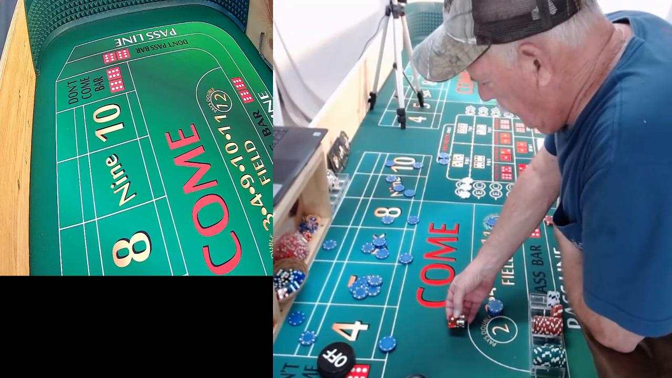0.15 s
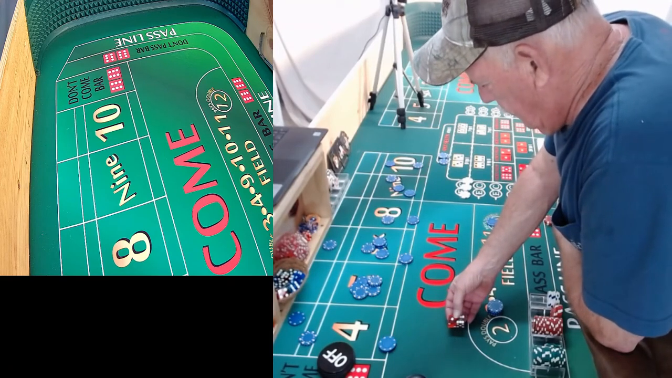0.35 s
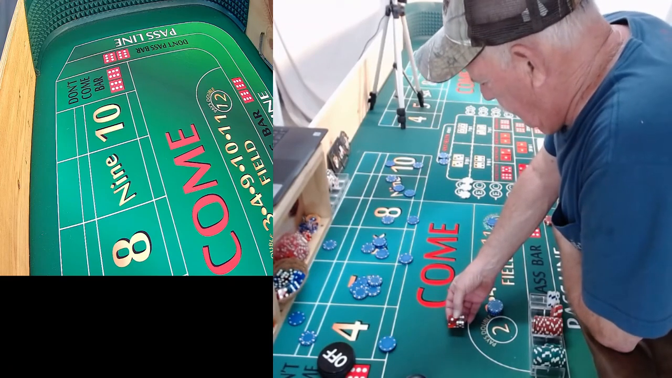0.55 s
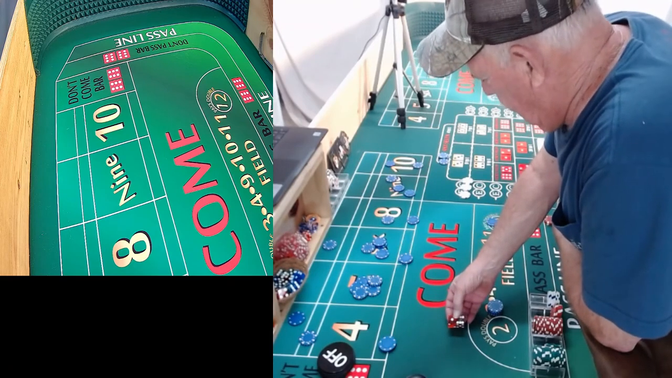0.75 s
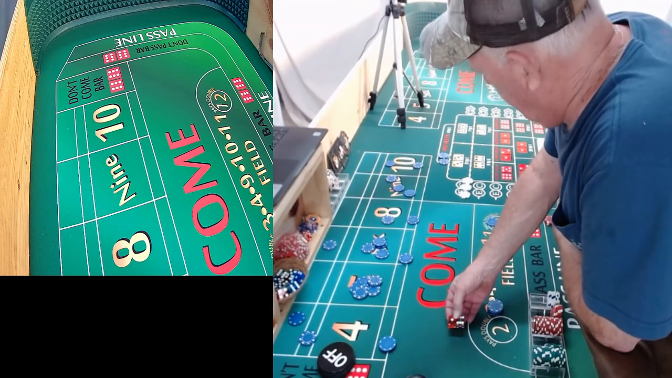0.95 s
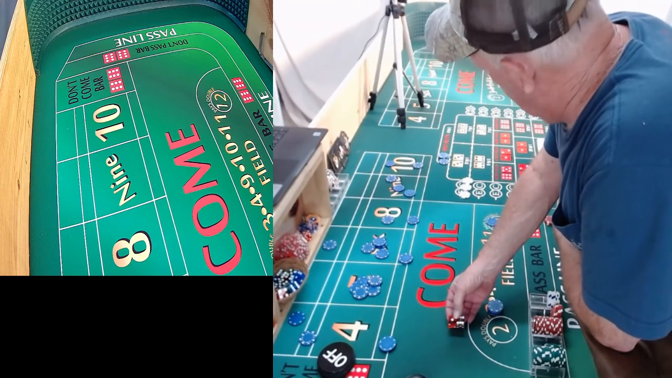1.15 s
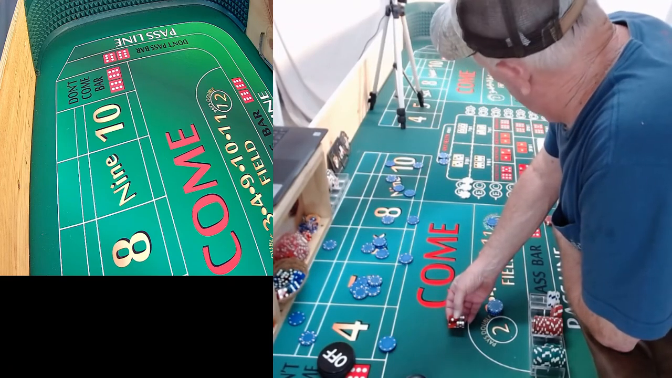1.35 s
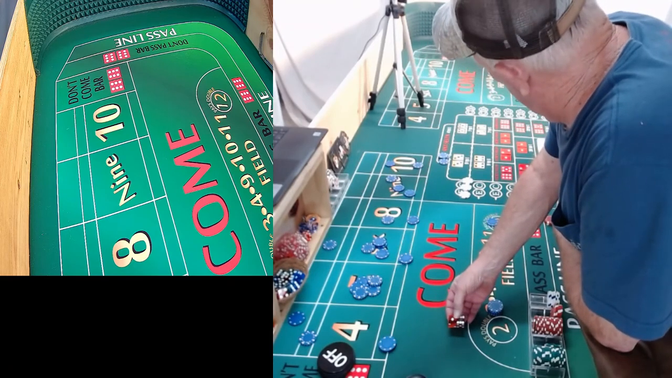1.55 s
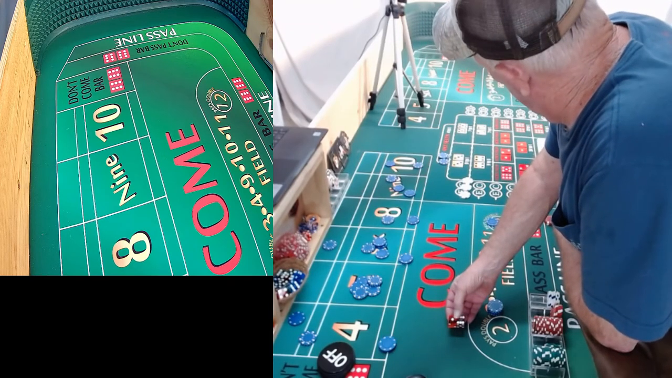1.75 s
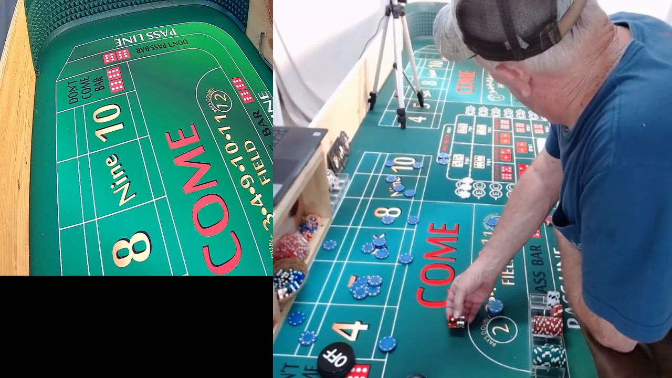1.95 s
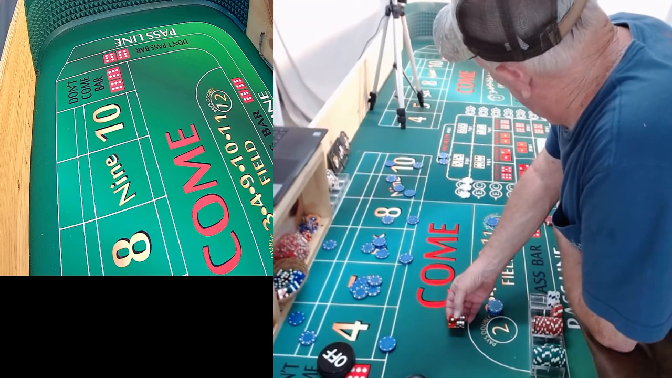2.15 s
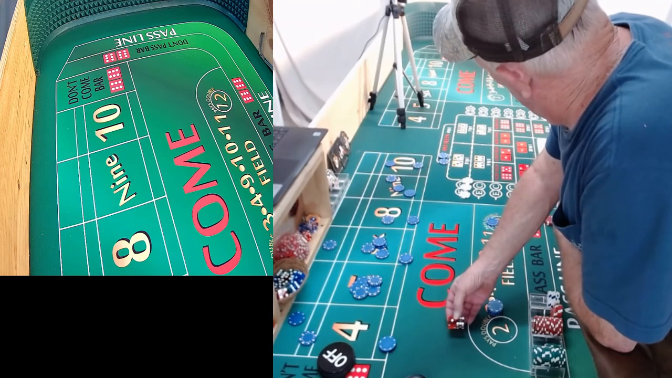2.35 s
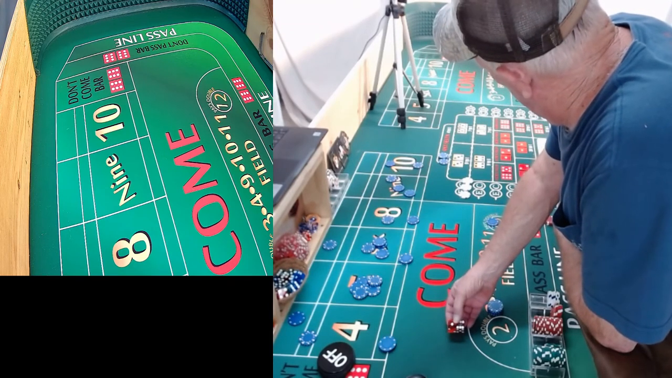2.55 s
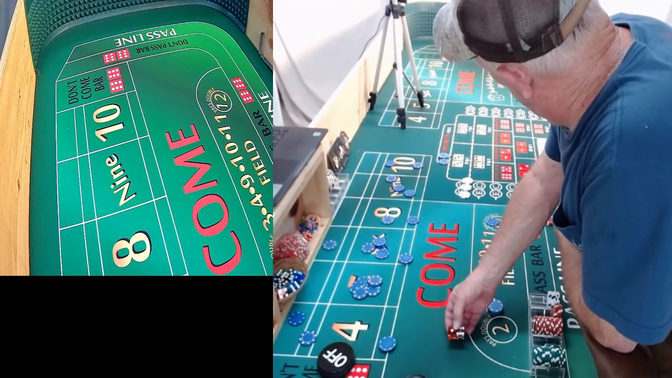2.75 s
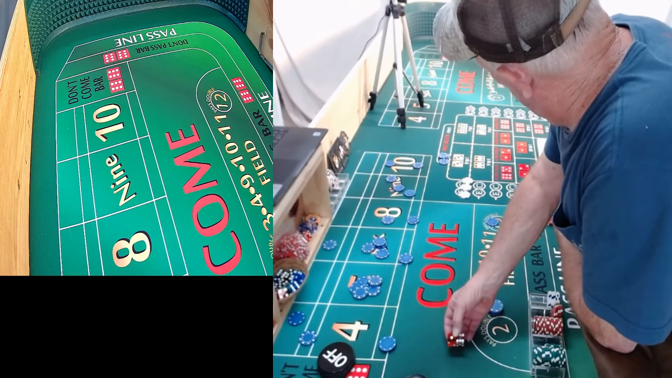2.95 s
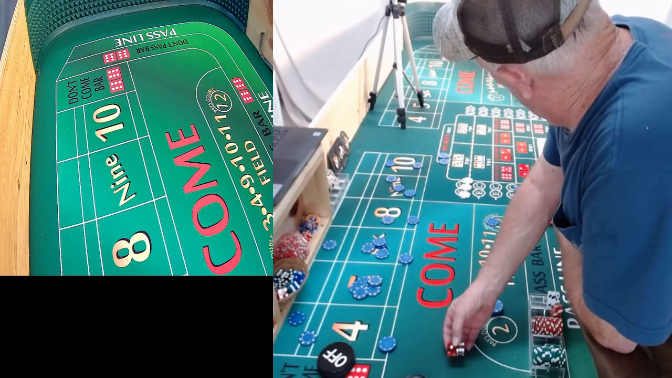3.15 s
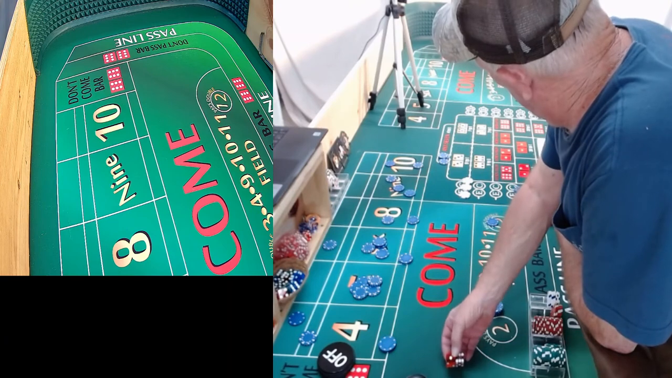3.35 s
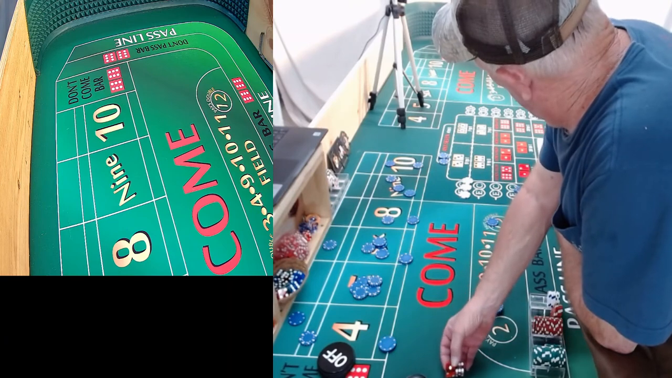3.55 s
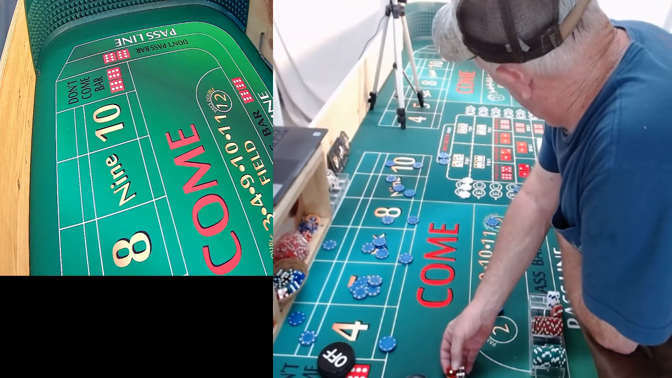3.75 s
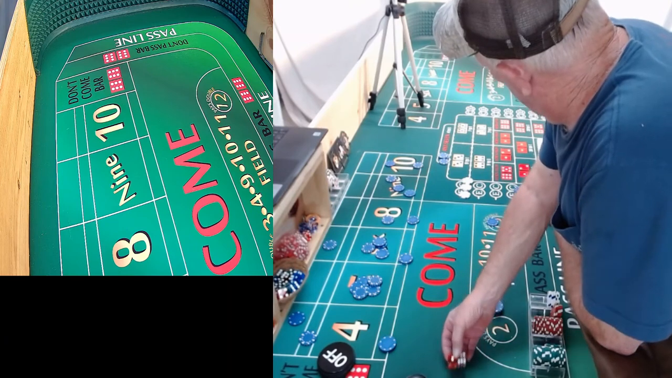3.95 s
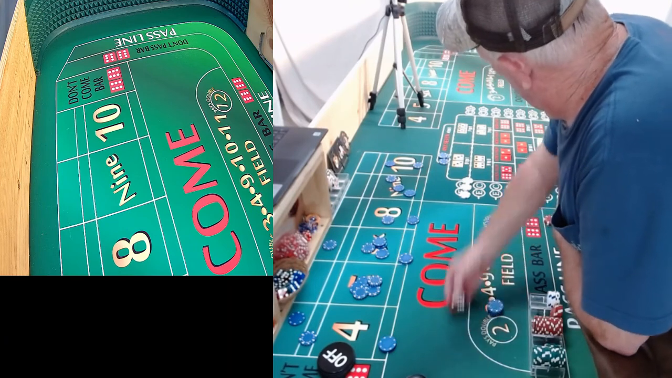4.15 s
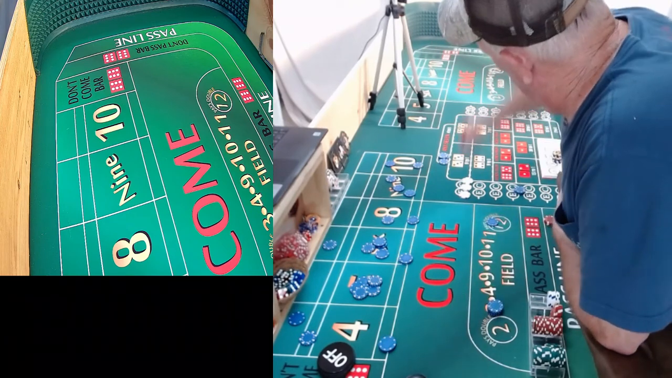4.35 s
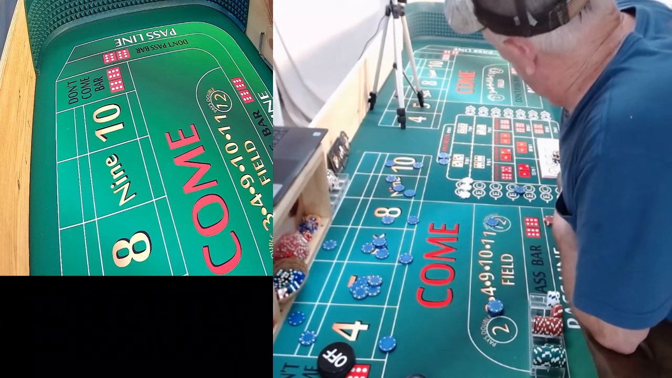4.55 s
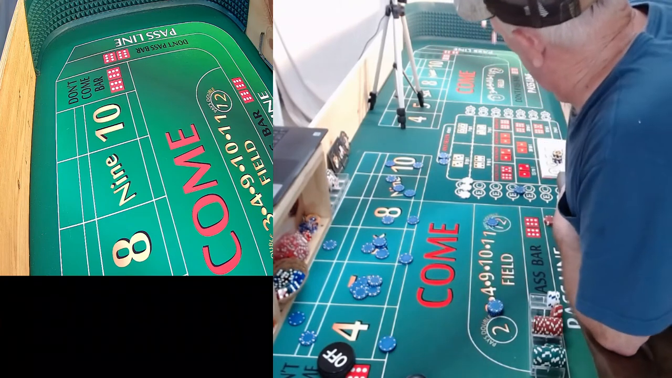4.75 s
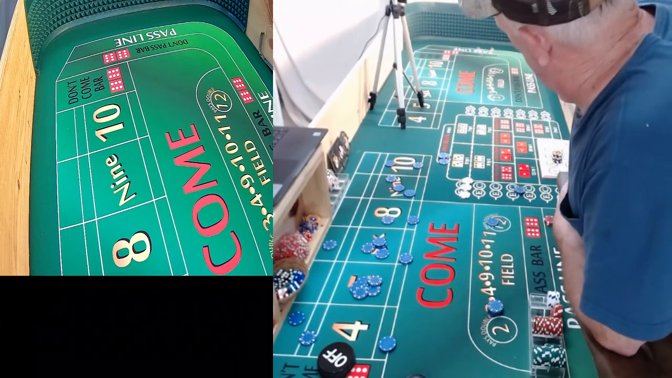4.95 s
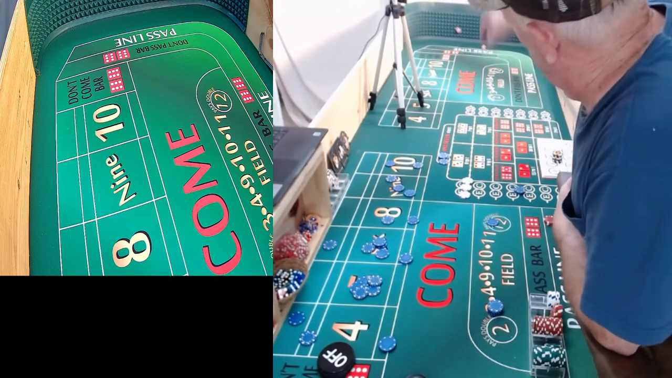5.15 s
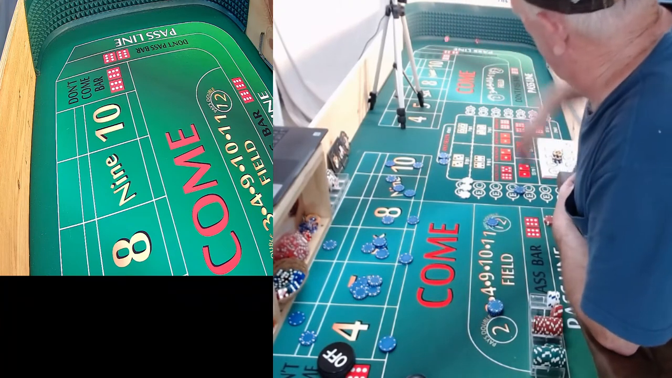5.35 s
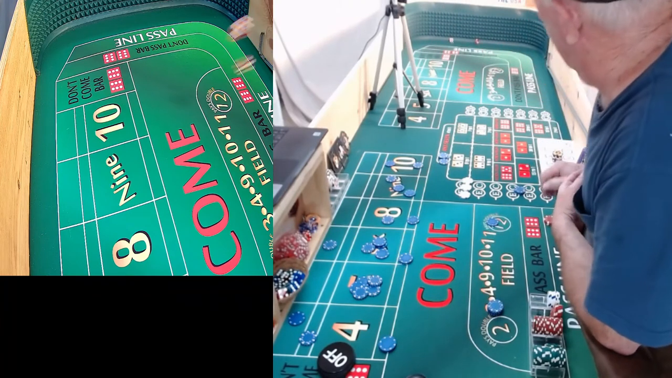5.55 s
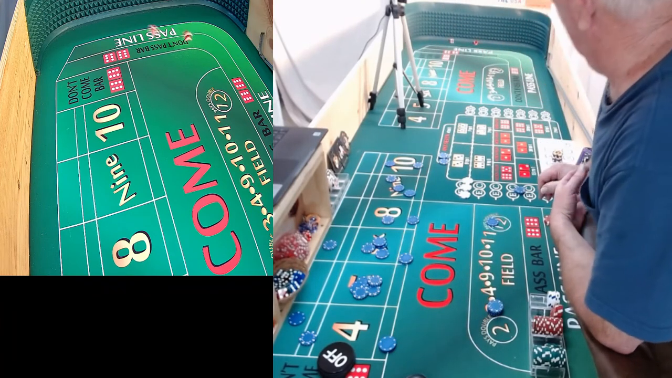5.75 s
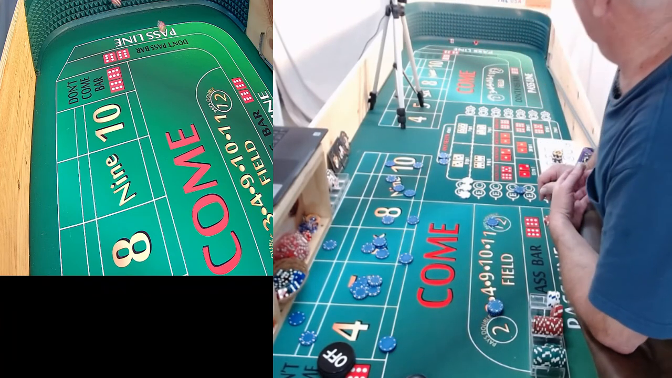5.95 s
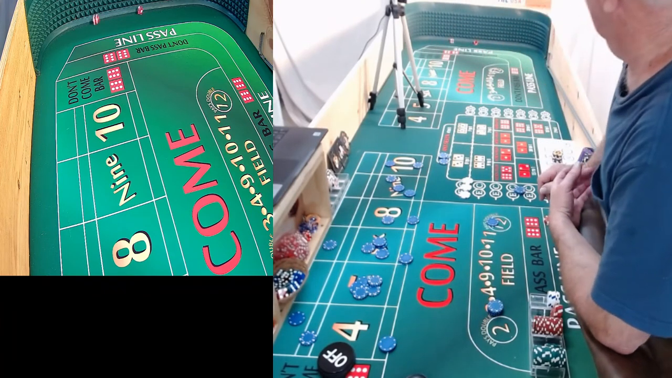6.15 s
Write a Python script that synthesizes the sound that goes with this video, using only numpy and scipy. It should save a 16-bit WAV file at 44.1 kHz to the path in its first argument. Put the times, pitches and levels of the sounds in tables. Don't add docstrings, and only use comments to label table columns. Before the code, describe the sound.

A low fan drone with motor hum, airy rush and occasional duct booms runs for nearly five seconds in a room. Two dice then hit a felt-covered wooden table in a tight, very loud double knock, bouncing quickly and settling with woody resonance. The background sinks slightly as a few tiny plastic ticks follow. Close, narrow-band camera microphone that overloads on the impact.

```python
import sys
import numpy as np
from scipy import signal
from scipy.io import wavfile

SR = 44100
rng = np.random.default_rng(int(sys.argv[2]) if len(sys.argv) > 2 else 0)


def master_out(mix):
    frames = np.transpose(np.atleast_2d(mix))
    ceiling = np.clip(frames, -1, 1)
    pcm = np.round(ceiling * 32767).astype(np.int16)
    wavfile.write(sys.argv[1], SR, pcm)


def volts_from_decibels(level):
    exponent = np.asarray(level, float) / 20
    return 10 ** exponent


N = 272965

# start_s, level_db, contact_brightness_hz, thud_against_knock_db, ring_time_factor
DICE_BLOWS = [
    (4.918, -6, 2430, 5, 1.12),
    (4.951, -1.5, 2896, 4, 0.46),
    (4.966, -7, 2584, 2.5, 0.49),
    (4.986, -7.5, 1980, -11.5, 0.49),
    (5.001, -13, 1600, 3.5, 0.57),
    (5.131, -13, 1500, 8, 0.76),
    (5.205, -12, 398, -3.5, 1.3),
    (5.239, -23.5, 2200, 4, 0.6),
    (5.397, -34.5, 1210, 9, 0.88),
]
# pitch_hz, level_db, t60_s
TABLE_MODES = [(117.7, 6.5, 0.2), (149.9, 8.5, 0.4), (191, 2.5, 0.28), (250.8, 4.5, 0.35),
               (330.3, 6.5, 0.26), (406, -1, 0.11), (490, -6.5, 0.1), (919, 1.5, 0.27), (1007, -4, 0.51),
               (1150, -9.5, 0.24), (1218, 3, 0.1), (1430, -10.5, 0.091), (1696, -7, 0.12),
               (2312, -4.5, 0.11)]
# frequency_hz, level_db_per_hz
ECHO_COLOUR = [(60, -19.5), (130, -7.5), (300, -1), (600, -13.5), (1100, -13), (1800, -21.5), (2600, -35.5),
               (4200, -24.5), (7000, -42.5)]
# frequency_hz, t60_s
ECHO_T60 = [(60, 0.22), (200, 0.18), (400, 0.25), (1000, 0.3), (2000, 0.3), (4000, 0.14), (8000, 0.12)]


def table_knock(t, thud_db, ring):
    knock = np.zeros(len(t))
    for hz, db, t60 in TABLE_MODES:
        start = 1 - np.exp(-t * hz / 1.8)
        luck_db = rng.normal(0, 2.5)
        level = volts_from_decibels(db - 13.5 + thud_db * (hz < 700) + luck_db - 60 * t / (t60 * ring))
        knock += level * start * np.sin(2 * np.pi * hz * t + rng.uniform(0, 2 * np.pi))
    return knock


def echo_cloud(t, thud_db, ring):
    cloud = np.zeros(len(t))
    for hz, band in bands(len(t), ECHO_COLOUR):
        build = 1 - np.exp(-t * np.sqrt(hz) / 0.11)
        fade = (t / (at_hz(ECHO_T60, hz) * ring)) ** 1.23
        cloud += band * build * volts_from_decibels(20.0 + thud_db * (hz < 700) - 60 * fade)
    return cloud


def dice():
    out, size = np.zeros(N + SR), SR // 2
    t = np.arange(size) / SR
    for s, blow_db, bright_hz, thud_db, ring in DICE_BLOWS:
        knock = table_knock(t, thud_db, ring) + echo_cloud(t, thud_db, ring)
        felt = signal.butter(3, bright_hz, fs=SR, output="sos")
        at = round(s * SR)
        out[at:at + size] += volts_from_decibels(blow_db) * signal.sosfilt(felt, knock)
    return out[:N]


# frequency_hz, level_db_per_hz
FAR_WALLS = [(900, -11), (2000, 2.5), (3600, 1.5), (5200, -1), (7000, -16)]


def late_tail():
    since = since_landing()
    far = volts_from_decibels(-48.5 - 60 * since / 2.5) * air(FAR_WALLS, patchy_db=-2.0, rate=7)
    rails = volts_from_decibels(-31 - 60 * since / 0.8) * air(RUSH_COLOUR, patchy_db=5.0, rate=7)
    return (since > 0) * (far + rails)


# start_s, peak_level_db, ring_pitch_hz
PLASTIC_TICKS = [
    (5.513, -39.5, 3600),
    (5.885, -42, 3900),
    (5.931, -46, 5170),
    (5.968, -52, 3600),
    (6.155, -47, 5200),
]


def ticks():
    out, t = np.zeros(N + SR), np.arange(SR // 10) / SR
    click_band = signal.butter(3, [2600, 6800], "band", fs=SR, output="sos")
    for s, peak_db, hz in PLASTIC_TICKS:
        click_and_tail = volts_from_decibels(-60 * t / 0.008) + volts_from_decibels(-11 - 60 * t / 0.07)
        puff = rng.standard_normal(len(t)) * click_and_tail
        bright = signal.sosfilt(click_band, puff)
        at = round(s * SR)
        out[at:at + len(t)] += volts_from_decibels(peak_db + 3.0) * (bright + volts_from_decibels(8.5) * resonance(puff, hz, 494))
    return out[:N]


# frequency_hz, level_db_per_hz
RUMBLE_COLOUR = [(75, -29.5), (100, -13), (140, -12), (185, 1.5), (240, -5.5), (320, -7), (420, -11.5),
                 (520, -21.5), (620, -16), (800, -32.5), (1000, -43.5)]
# pitch_hz, width_hz, level_against_rumble_db
ROOM_TONES = [(210.2, 12.1, -5), (232.9, 17, -17), (317.1, 9.8, -14.5), (405.4, 4.1, -21.5),
              (583.8, 13, -25.5)]


def rumble(gust_db):
    rough = air(RUMBLE_COLOUR, patchy_db=1.67, rate=2.7)
    room = sum(volts_from_decibels(db) * sung(hz, width_hz) for hz, width_hz, db in ROOM_TONES)
    return volts_from_decibels(-24.0 + gust_db + ducking() - 1.95) * (rough + room)


# frequency_hz, level_db_per_hz
RUSH_COLOUR = [(560, -12), (750, -4), (1000, 0.5), (1400, -5), (2000, -12), (2600, -23), (3200, -36),
               (4200, -41.5)]


def rush(gust_db):
    rise_db = 0.37 * np.arange(N) / SR
    level_db = -45.5 + rise_db + 0.3 * gust_db + 0.72 * ducking()
    return volts_from_decibels(level_db - 0.43) * (air(RUSH_COLOUR, patchy_db=1.1, rate=8.0) + volts_from_decibels(-7.5) * sung(955, 70))


# start_s (centre), peak_level_db, half_length_s
DUCT_SWELLS = [
    (.25, -33, 0.63),
    (1.548, -44.5, 0.091),
    (2.456, -40, 0.22),
    (2.897, -33.5, 0.18),
    (3.272, -36, .15),
    (4.076, -41, 0.24),
    (5.11, -32, 0.11),
    (0.458, -36, 0.11),
]


def boom():
    swell = volts_from_decibels(-44) + sum(volts_from_decibels(db) * bell(s, half_s) for s, db, half_s in DUCT_SWELLS)
    return swell * volts_from_decibels(1.0) * sung(113.7, 18)


# pitch_hz, level_db (rms)
MOTOR_LINES = [(62.6, -44.5), (212, -30.5), (794, -65.5), (1697, -67.5), (2868, -78), (2927, -80)]


def motor_hum():
    t = np.arange(N) / SR
    hum = 0
    for hz, db in MOTOR_LINES:
        hum = hum + np.sqrt(2) * volts_from_decibels(db + 1.0 * drift(3.5)) * np.sin(2 * np.pi * hz * t)
    return hum * volts_from_decibels(1.2 * ducking())


# frequency_hz, level_db_per_hz
HISS_COLOUR = [(2150, -5.5), (2900, -3), (3150, -12.5), (3400, 4.5), (4200, 3.5), (5200, 4), (6600, -2),
               (7500, -14), (8600, -28.5), (10500, -36.5)]
# start_s (centre), level_db, half_length_s
AIR_GUSTS = [
    (1.175, -2, 0.16),
    (2.272, 3.0, 0.12),
    (3.014, -1.9, 0.23),
    (4.852, 0.9, .2),
]


def fan():
    gust_db = sum(db * bell(s, half_s) for s, db, half_s in AIR_GUSTS)
    hiss = volts_from_decibels(-56) * air(HISS_COLOUR, patchy_db=-1.0, rate=5.5)
    return rumble(gust_db) + boom() + motor_hum() + rush(gust_db) + hiss


def since_landing():
    return np.clip(np.arange(N) / SR - DICE_BLOWS[0][0], 0, None)


def ducking():
    drop_db, drop_s, sag_db_per_s = -0.4, 0.11, -3.5
    since = since_landing()
    return drop_db * (1 - np.exp(-since / drop_s)) + sag_db_per_s * since


def bell(s, half_s):
    return np.exp(-((np.arange(N) / SR - s) / half_s) ** 2)


def air(spectrum, patchy_db, rate):
    together = drift(2.0)
    total = 0
    for hz, band in bands(N, spectrum):
        flicker_db = patchy_db * (0.26 * together + drift(rate))
        total = total + band * volts_from_decibels(flicker_db)
    return rms_one(total)


def sung(hz, width_hz):
    noise = rng.standard_normal(N + SR)
    once = resonance(noise, hz, width_hz)
    return rms_one(resonance(once, hz, width_hz)[SR:])


def bands(size, spectrum):
    white = rng.standard_normal((2, size + 4000))
    lowest, highest = spectrum[0][0], spectrum[-1][0]
    edges = lowest * 2 ** np.arange(0, np.log2(highest / lowest) + 0.2, 1 / 5)
    for k, (low, high) in enumerate(zip(edges, edges[1:])):
        hz = np.sqrt(low * high)
        band_filter = signal.butter(2, [low, high], "band", fs=SR, output="sos")
        band = signal.sosfilt(band_filter, white[k % 2])
        yield hz, volts_from_decibels(at_hz(spectrum, hz)) * band[-size:]


def drift(rate):
    r = np.exp(-80 * np.pi * rate / SR)
    noise = rng.standard_normal(N // 40 + 2002)
    slow = signal.lfilter([1], [1, -2 * r, r * r], noise)[2000:]
    return np.interp(np.arange(N) / 40, np.arange(len(slow)), rms_one(slow))


def resonance(x, hz, width_hz):
    r = np.exp(-np.pi * width_hz / SR)
    poles = [1, -2 * r * np.cos(2 * np.pi * hz / SR), r * r]
    return signal.lfilter([(1 - r * r) / 2, 0, (r * r - 1) / 2], poles, x)


def at_hz(points, hz):
    table_hz, value = np.transpose(points)
    return np.interp(np.log(hz), np.log(table_hz), value)


def rms_one(x):
    return x / np.sqrt(np.mean(x ** 2) + 1e-20)


def scene():
    return (dice() + late_tail() + ticks() + fan())[None]


def roll_off(x):
    return signal.sosfilt(signal.butter(12, 16000, fs=SR, output="sos"), x)


# frequency_hz, width_hz, level_db
MICROPHONE_NOTCHES = [(750, 170, -20), (715, 90, -6), (4495, 700, -26), (6000, 800, -16), (7960, 1300, -24),
                      (8200, 900, -14)]


def record(dry):
    x = dry
    for hz, width_hz, db in MICROPHONE_NOTCHES:
        x = x - (1 - volts_from_decibels(db)) * resonance(x, hz, width_hz)
    x = signal.sosfilt(signal.cheby2(12, 40, 9150, fs=SR, output="sos"), x)
    x = signal.sosfilt(signal.butter(4, 48, "high", fs=SR, output="sos"), x)
    overloaded = np.clip(x, -0.99, 0.99)
    return roll_off(overloaded)


dry = scene()
out = record(dry)
master_out(out)
```